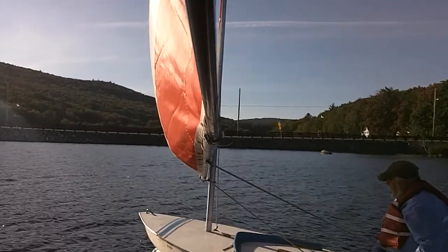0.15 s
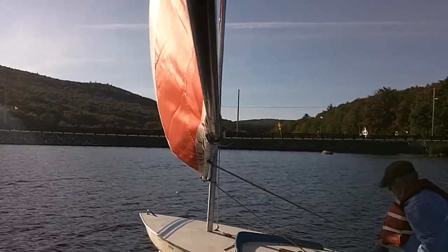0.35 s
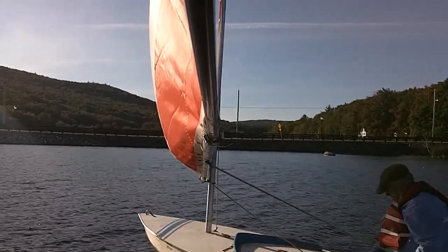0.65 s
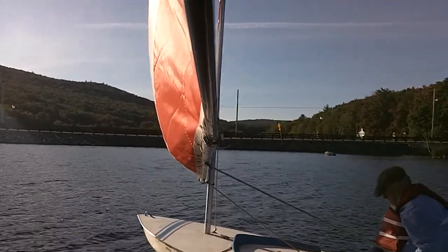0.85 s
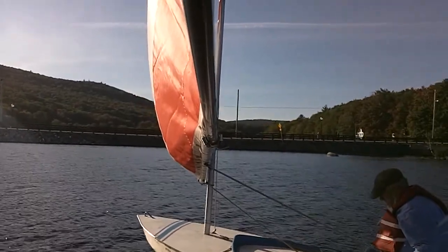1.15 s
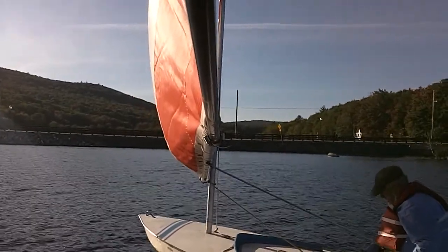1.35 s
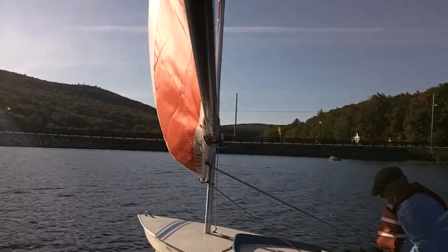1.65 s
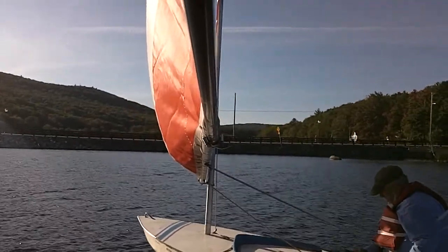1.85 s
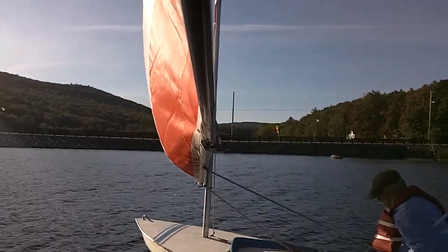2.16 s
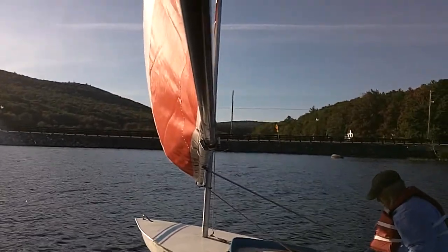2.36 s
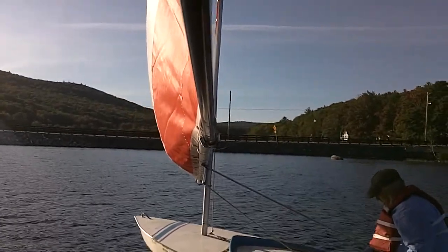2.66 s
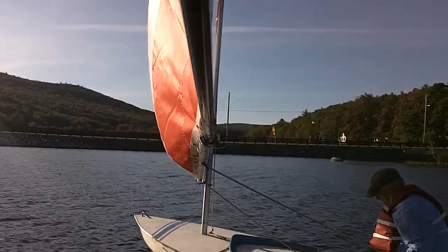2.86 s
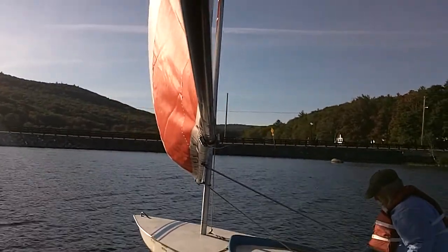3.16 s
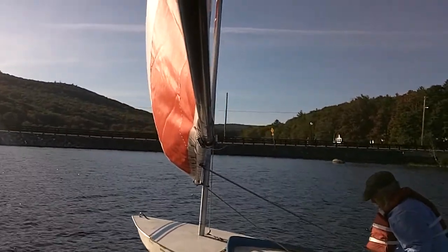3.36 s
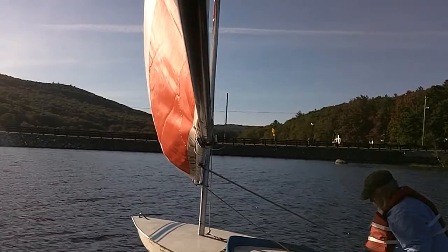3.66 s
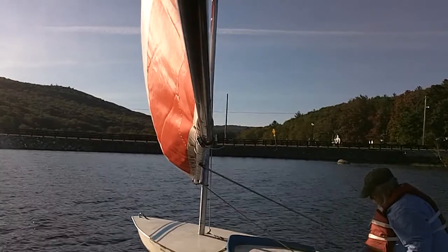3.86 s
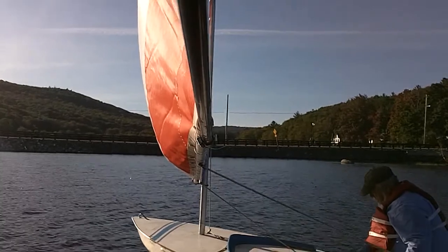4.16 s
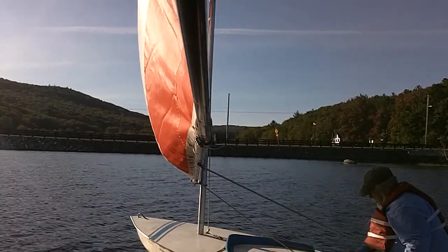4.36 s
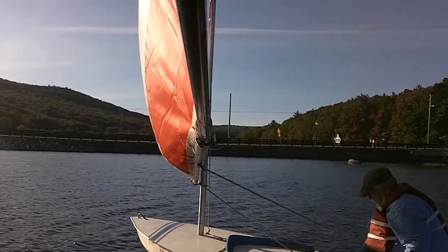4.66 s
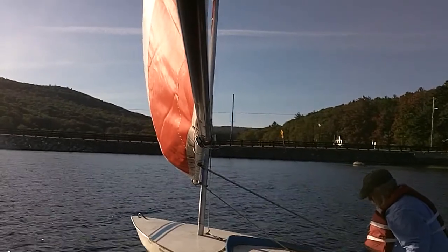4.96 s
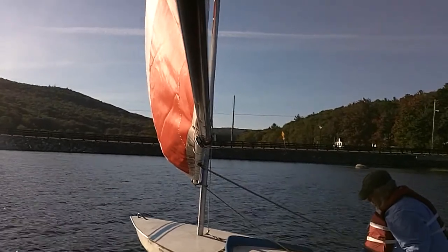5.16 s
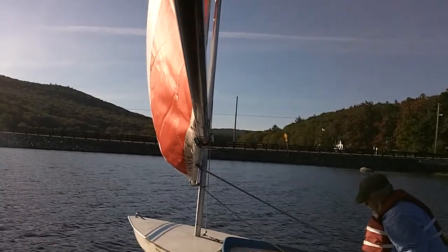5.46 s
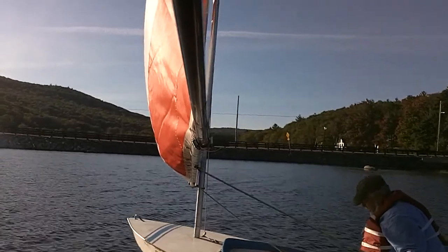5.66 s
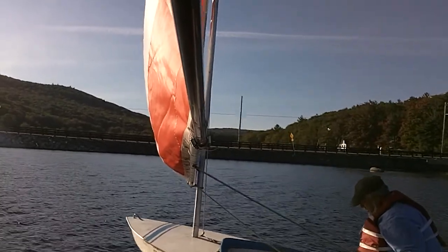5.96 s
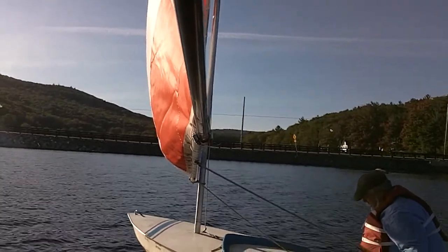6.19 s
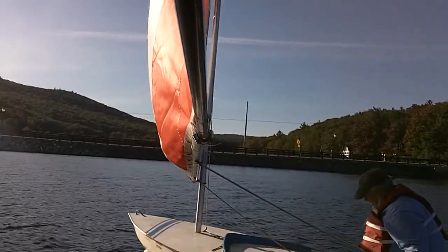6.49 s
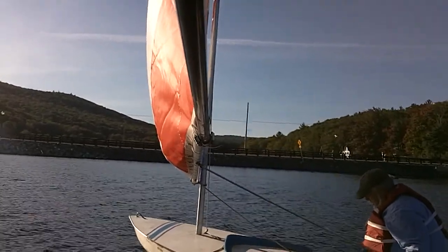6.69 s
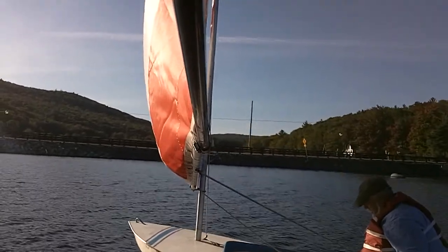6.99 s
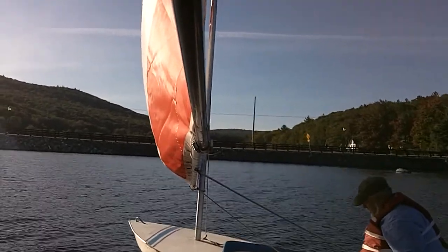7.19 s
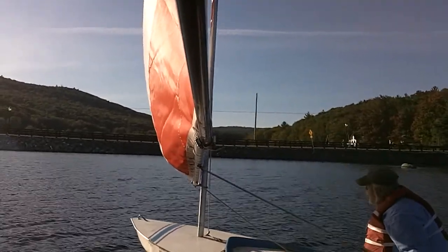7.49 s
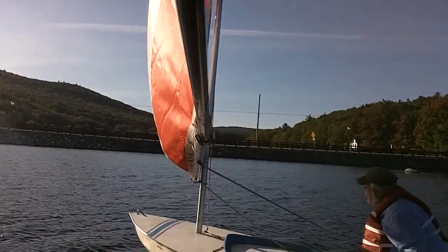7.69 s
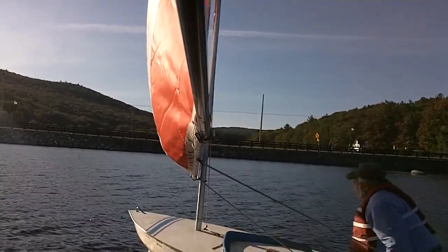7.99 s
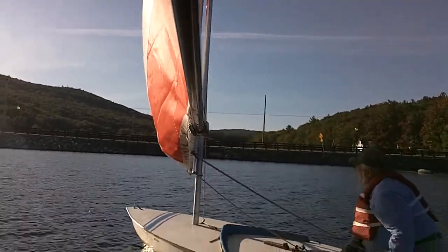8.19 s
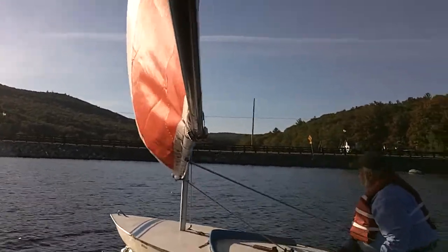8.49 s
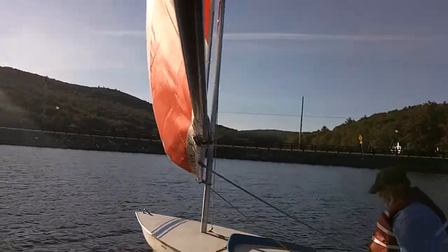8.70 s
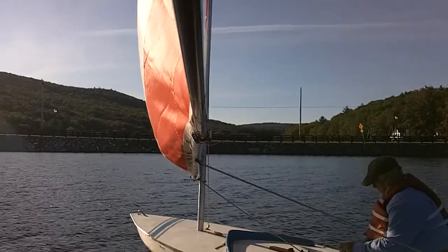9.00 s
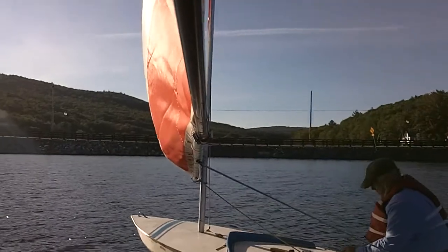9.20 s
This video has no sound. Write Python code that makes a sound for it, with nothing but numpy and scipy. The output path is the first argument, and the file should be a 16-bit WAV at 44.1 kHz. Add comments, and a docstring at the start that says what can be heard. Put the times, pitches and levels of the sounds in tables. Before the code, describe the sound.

From a small camera aboard a gliding sailboat, dense small bubbles ring and gurgle over a soft wash of water. Tiny drops tick and fizz, nearby bubbles pop at irregular moments, and wavelets lightly slap the hull. Deep gusts flutter and thump against the microphone throughout, heaviest in the second half. Outdoors, mono, close and muffled on top.

```python
"""A small sailboat glides over a rippled lake. From the start, wavelets gurgle under the hull, the bow wave
fizzes and a breeze rumbles and flutters: crowds of ringing bubbles and drops over coloured noise.
Soon single bubbles plop close by, short gusts swell the wind and droplets tick back onto the water.
Then wavelets slap the hull with bursts of noise and bubbles, and eddies thump as brief swings of pressure.
All is heard through the single microphone of a small camera, with several notches and little treble."""
import sys
import numpy as np
from scipy import signal
from scipy.fft import rfft, irfft, next_fast_len
from scipy.io import wavfile
from scipy.ndimage import uniform_filter1d

SR = 44100
rng = np.random.default_rng(int(sys.argv[2]) if len(sys.argv) > 2 else 0)


def output_pcm(signal):
    """Save a mono or channel-first signal as 16-bit PCM at the path in sys.argv[1].

    Samples are clipped to [-1, 1] before scaling.
    """
    pcm = np.clip(np.atleast_2d(signal).T, -1, 1) * 32767
    wavfile.write(sys.argv[1], SR, np.round(pcm).astype(np.int16))


N = 411894
TIME = np.arange(N) / SR


def from_db(db):
    """Turn decibels into a factor for loudness."""
    return 10 ** (np.asarray(db) / 20)


def rms_one(x):
    """Scale a sound to an average (rms) strength of 1."""
    return x / np.sqrt(np.mean(x ** 2) + 1e-20)


def in_time(rows):
    """Draw straight lines between the rows of a table, one curve per column after the time."""
    times, *columns = np.transpose(rows)
    return [np.interp(TIME, times, column) for column in columns]


def at_hz(points, hz):
    """Read a level in dB from a table of frequencies, spaced by ratio as the ear hears pitch."""
    knots, db = np.transpose(points)
    return np.interp(np.log(np.maximum(hz, 1)), np.log(knots), db)


def coloured(x, spectrum):
    """Make each frequency of a sound stronger or weaker, following a smooth curve."""
    size = next_fast_len(N + SR // 10)
    hz = np.arange(size // 2 + 1) * SR / size
    return irfft(rfft(x, size) * from_db(at_hz(spectrum, hz)), size)[:N]


def drift(corner_hz):
    """Wander slowly by chance with a spread of 1: noise smoothed above the corner frequency."""
    step = 40  # one value every 40 samples is enough for so slow a curve
    warm_up = 2000
    r = np.exp(-2 * np.pi * corner_hz * step / SR)
    noise = rng.standard_normal(N // step + warm_up + 2)
    slow = signal.lfilter([1], [1, -2 * r, r * r], noise)[warm_up:]
    return np.interp(np.arange(N) / step, np.arange(len(slow)), rms_one(slow))


def ring(clicks, hz, t60):
    """Let each click start a sine as high as the click, which fades by 60 dB in t60 seconds."""
    r = from_db(-60 / (t60 * SR))
    w = 2 * np.pi * hz / SR
    return signal.lfilter([0, np.sin(w)], [1, -2 * r * np.cos(w), r * r], clicks + 1e-18)


def add(out, s, sound):
    """Mix a short sound in at time s."""
    start = int(np.clip(round(s * SR), 0, N))
    out[start:start + len(sound)] += sound[:N - start]


def bubble(hz, t60, rise):
    """An air pocket rings and fades as its pitch glides by rise octaves; a bigger glide holds the ring longer."""
    t = np.arange(int(t60 * SR) + 2) / SR
    bend = 1.35 + min(abs(rise), 1)
    fade = np.exp(-np.log(1000) * (t / t60) ** bend)
    onset = 1 - np.exp(-2 * t * hz)
    pitch = hz * 2 ** (rise * t / t60)
    return fade * onset * np.sin(2 * np.pi * np.cumsum(pitch) / SR)


def turbulence(spectrum, lumpy_db, corner_hz):
    """Churning flow is noise of one colour whose strength wanders, so it comes in lumps."""
    noise = rng.standard_normal(N)
    lumps = from_db(lumpy_db * drift(corner_hz))
    return rms_one(coloured(noise * lumps, spectrum))


def patter(per_s, low_hz, high_hz, cycles, spread_db, clump_db, count=24):
    """Tiny drops and bursting bubbles come in clumps and ring for a few cycles."""
    luck = rng.random(N)
    chance = per_s * from_db(clump_db * drift(12)) / SR
    at = np.flatnonzero(luck < chance)
    size, sign, pitch = rng.random((3, N))[:, at]
    # most clicks are small and a few are large
    heights = from_db(spread_db * np.minimum(-np.log(1 - size), 4.5)) * np.sign(sign - .5)
    out = np.zeros(N)
    for k, hz in enumerate(np.geomspace(low_hz, min(high_hz, .45 * SR), count)):
        clicks = np.zeros(N)
        clicks[at] = heights * ((pitch * count).astype(int) == k)
        out += ring(clicks, hz, cycles / hz)
    return rms_one(out)


# how strong the distant bubbles are by pitch: (pitch [Hz], relative level [dB])
BUBBLE_LEVELS = [(400, -10.5), (2500, 4.5)]


def gurgle(low_hz, high_hz, cycles, rise, spread_db, count):
    """A crowd of smaller bubbles along the hull; the longer one rings, the further it can glide."""
    out = np.zeros(N)
    for when, pitch, size, life, glide in rng.random((count, 5)):
        hz = low_hz * (high_hz / low_hz) ** pitch
        stretch = 2 ** (2 * life - 1)
        db = at_hz(BUBBLE_LEVELS, hz) + spread_db * min(-np.log(1 - size), 2)
        height = from_db(db) / np.sqrt(stretch)
        add(out, when * N / SR, height * bubble(hz, stretch * cycles / hz, rise * glide * stretch))
    return rms_one(out)


# water flowing along the boat, before the mix trims:
# (time [s], gurgle level [dB], spray level [dB])
WATER_FLOW = [(0.0, -49, -55.5), (0.23, -48.5, -52), (1.77, -48.5, -56.5), (2.26, -51, -54.5),
              (2.36, -48.5, -53), (3.09, -49, -58.5), (3.46, -47, -51.5), (3.64, -51, -57),
              (4.06, -48, -52.5), (4.14, -50, -55.5), (6.11, -49, -54), (7.05, -48, -56.5),
              (7.18, -50.5, -61), (7.36, -52, -56.5), (7.67, -52, -60), (8.48, -47.5, -51),
              (9.24, -48, -55.5)]
# colour of the water noise at the hull: (frequency [Hz], relative level per Hz [dB])
WASH_COLOUR = [(150, -4.5), (300, -6), (420, -2), (600, -3), (1000, -6), (2100, -5.5), (3200, -24),
               (6000, -68)]


def hull_water():
    """Wavelets fold air under the hull: low and high bubbles ring, over splashes and a wash of noise."""
    gurgle_db, _ = in_time(WATER_FLOW)
    plops = from_db(-6.2) * gurgle(
        low_hz=600, high_hz=1350, cycles=22, rise=.5, spread_db=2.8, count=760)
    blips = from_db(-4.8) * gurgle(
        low_hz=900, high_hz=2400, cycles=23, rise=.25, spread_db=3.8, count=1200)
    splashes = from_db(-8.2) * patter(
        per_s=420, low_hz=650, high_hz=2600, cycles=9, spread_db=3.2, clump_db=3.5)
    wash = from_db(-6) * turbulence(WASH_COLOUR, lumpy_db=1.0, corner_hz=22)
    return from_db(gurgle_db - 0.86) * (plops + blips + splashes + wash)


# colour of the spray noise at the bow: (frequency [Hz], relative level per Hz [dB])
SPRAY_COLOUR = [(1200, 10), (3300, 10), (4500, 9.5), (9500, 11), (15000, -53)]
SPLASH_DB, SPLASH_S = 3.5, 0.0097  # swell of the spray, and the time it takes to build and to fade


def bow_spray():
    """The bow wave fizzes: tiny rings and hissing noise, swelling briefly around each falling droplet."""
    _, spray_db = in_time(WATER_FLOW)
    splash_db = SPLASH_DB * sum(
        np.exp(-np.minimum(abs(TIME - s) / SPLASH_S, 20)) for s, _ in DROPLETS)
    fizz = from_db(1.5) * patter(
        per_s=1150, low_hz=2900, high_hz=6000, cycles=30, spread_db=3.5, clump_db=3.2)
    spray = from_db(2.1) * turbulence(SPRAY_COLOUR, lumpy_db=2.1, corner_hz=28)
    mist = from_db(6.5) * patter(
        per_s=420, low_hz=6400, high_hz=13500, cycles=29, spread_db=2.8, clump_db=5.5)
    return from_db(spray_db + splash_db + 2.0) * (fizz + spray + mist)


# the breeze between gusts, before the trims: (time [s], rumble level [dB], flutter level [dB])
BREEZE_LEVELS = [(0.0, -46.5, -57.5), (0.86, -41, -52), (1.8, -46.5, -56), (2.2, -47, -54),
                 (2.65, -38, -53.5), (3.15, -41.5, -53), (3.61, -42.5, -54), (4.79, -43.5, -55.5),
                 (6.4, -42, -51.5), (6.84, -37, -48), (8.25, -46.5, -50.5), (8.84, -44, -47.5),
                 (9.34, -47, -47.5)]
# colours of large and of small eddies: (frequency [Hz], relative level per Hz [dB])
RUMBLE_COLOUR = [(6, -8), (15, 4.5), (32, 2), (52, -2), (80, -5.5), (120, -20), (250, -79)]
FLUTTER_COLOUR = [(40, -6), (80, -3.5), (100, 0.5), (165, -8.5), (260, -14), (400, -24), (900, -55)]
BREEZE_WAVERS_DB, BREEZE_CORNER_HZ = 1.5, 5.1
FLUTTER_FOLLOWS = 0.36  # share of a gust's rise in dB that the flutter takes on


def wind():
    """Large eddies rumble on the microphone port, small ones flutter harder in gusts, single ones thump."""
    breeze_db, flutter_db = in_time(BREEZE_LEVELS)
    breeze = from_db(breeze_db + 3.0 + BREEZE_WAVERS_DB * drift(BREEZE_CORNER_HZ))
    strength = np.sqrt(breeze ** 2 + gusts())
    rumble = turbulence(RUMBLE_COLOUR, lumpy_db=2.5, corner_hz=18.3)
    # even out the noise, so that breeze and gusts set its strength
    local_power = uniform_filter1d(rumble ** 2, size=6000)
    rumble = rumble / np.sqrt(local_power + 1e-9)
    flutter_strength = from_db(flutter_db + 4.5) * (strength / breeze) ** FLUTTER_FOLLOWS
    flutter = flutter_strength * turbulence(FLUTTER_COLOUR, lumpy_db=2.5, corner_hz=13.6)
    thumps = from_db(-1) * buffets(width_s=.0045)
    return from_db(1.03) * strength * rumble + flutter + thumps


# the nearest bubbles: (time [s], starting pitch [Hz], level before the mix [dB],
# time to fade by 60 dB [s], glide over that time [octaves])
NEAR_BUBBLES = [(0.146, 545, -35, .036, .6), (0.151, 1300, -37, .022, .7), (0.265, 1260, -35, .025, .3),
                (0.546, 1060, -34, .025, .1), (0.603, 850, -37, .022, 0), (0.682, 520, -36, .07, 1.4),
                (0.814, 1130, -31, .022, .6), (0.841, 720, -33, .018, 0), (0.986, 650, -38, .045, .8),
                (1.344, 940, -37, .025, .3), (1.384, 630, -38, .045, 1.2), (1.441, 1030, -37, .03, .6),
                (1.56, 690, -31, .025, -.5), (1.566, 1270, -31, .028, .4), (1.572, 430, -39, .1, 1.7),
                (1.795, 1080, -33, .025, 0), (1.877, 1510, -32, .022, .3), (1.908, 1100, -35, .025, .3),
                (2.124, 650, -39, .035, .8), (2.345, 990, -32, .022, 0), (2.466, 410, -39, .03, 1.5),
                (2.77, 1150, -34, .025, 0), (2.955, 590, -38, .05, .2), (3.162, 1440, -30.5, .025, .1),
                (3.387, 2090, -22.5, .01, .05), (3.715, 1430, -36, .025, 0), (4.018, 950, -32, .018, .1),
                (4.024, 1080, -34, .04, .3), (4.438, 1720, -37, .022, .1), (4.478, 1080, -32.5, .022, 0),
                (4.583, 1040, -37, .04, 0), (4.753, 680, -33, .025, .1), (4.762, 780, -34, .025, .1),
                (5.075, 690, -38, .04, .5), (5.187, 1130, -34, .02, 0), (5.287, 1700, -28.5, .01, .1),
                (5.308, 1900, -36, .028, -.2), (5.52, 1370, -37, .04, .7), (5.832, 900, -36, .035, -.3),
                (5.912, 510, -40, .08, 1.1), (5.986, 540, -39, .055, .9), (6.165, 510, -42, .07, .7),
                (6.345, 440, -44, .11, .8), (6.571, 780, -36, .03, 0), (6.652, 1030, -35, .03, .3),
                (6.839, 1020, -27, .017, 0), (6.97, 510, -41, .06, .6), (7.038, 1380, -33, .02, .1),
                (7.329, 2000, -25, .006, 0), (7.741, 1550, -32, .022, .05), (8.175, 940, -32, .012, .1),
                (8.248, 570, -31, .05, -.1), (8.434, 490, -30, .025, 0), (8.446, 370, -30, .035, .1),
                (8.459, 570, -33, .035, .1), (8.53, 1230, -23, .008, .1), (8.738, 480, -38, .07, .7),
                (8.764, 800, -34, .03, 0), (8.79, 570, -39, .08, .7), (8.855, 1620, -34, .025, .05),
                (8.86, 1290, -35, .03, .4), (9.047, 970, -32.5, .042, .6), (9.093, 860, -35, .04, 0),
                (9.168, 990, -36, .03, .5), (9.244, 590, -38, .06, .7)]


def near_bubbles():
    """Single air pockets plop close by: some hold their pitch, many swoop upwards and a few sink."""
    out = np.zeros(N)
    for s, hz, db, t60, rise in NEAR_BUBBLES:
        add(out, s, from_db(db) * bubble(hz, t60, rise))
    return out


# gusts: (time of full strength [s], rumble level before the trim [dB], hold [s])
GUST_EVENTS = [(0.37, -31, 0.037), (0.52, -34, 0.11), (0.698, -34.5, 0.25), (1.176, -34.5, 0.24),
               (1.665, -28.5, 0.02), (2.407, -30, 0.08), (2.573, -38, 0.047), (2.774, -36, 0.39),
               (4.962, -34.5, 0.1), (5.13, -37.5, 0.087), (5.931, -30.5, 0.054), (6.678, -27, 0.066),
               (6.78, -34.5, .13), (6.998, -31.5, 0.044), (7.098, -31.5, 0.071), (7.421, -28.5, 0.034),
               (7.636, -25.5, 0.017), (8.187, -28.5, 0.022), (8.694, -33.5, 0.094)]
GUST_ATTACK_S, GUST_RELEASE_S = 0.0036, 0.023


def gusts():
    """Gusts swell quickly, hold and die away; their powers add up."""
    power = np.zeros(N)
    for s, db, hold_s in GUST_EVENTS:
        before = np.maximum(s - TIME, 0) / GUST_ATTACK_S
        after = np.maximum(TIME - s - hold_s, 0) / GUST_RELEASE_S
        power += (from_db(db) * np.exp(-np.minimum(before + after, 20))) ** 2
    return power


# droplets that fall back on the water: (time [s], level of the tick before the microphone [dB])
DROPLETS = [(0.376, -25.5), (0.496, -28), (0.552, -28), (0.699, -25), (0.854, -27), (0.953, -31),
            (1.283, -30.5), (1.687, -30), (1.895, -30), (2.378, -23), (2.685, -30), (3.223, -28),
            (3.885, -23), (4.019, -29), (5.02, -31), (5.57, -29), (5.71, -23.5), (6.165, -27), (6.247, -27),
            (7.005, -24), (7.036, -26), (7.383, -26), (8.304, -28), (8.432, -26), (8.705, -27),
            (8.923, -27)]
DROP_LOW_HZ, DROP_HIGH_HZ = 3250, 4580  # the ticks lie between these pitches


def droplets(cycles, splat_db, splat_s):
    """A falling drop splats on the surface as a burst of noise and traps a tiny bubble that ticks."""
    out = np.zeros(N)
    t = np.arange(SR // 20) / SR
    for s, db in DROPLETS:
        hz = rng.uniform(DROP_LOW_HZ, DROP_HIGH_HZ)
        # differences of noise sound bright
        splat = np.diff(rng.standard_normal(len(t) + 1)) * np.exp(-t / splat_s)
        add(out, s, from_db(db + splat_db) * splat)
        add(out, s, from_db(db) * bubble(hz, cycles / hz, 0))
    return out


# wavelets that slap the hull: (time [s], middle pitch [Hz], level before the mix [dB], length [s])
HULL_SLAPS = [(0.815, 800, -47, .1), (0.965, 1200, -48, .055), (1.565, 1200, -46, .04),
              (2.45, 600, -50, .15), (4.02, 1100, -49, .04), (4.753, 800, -45, .03), (5.07, 950, -48, .03),
              (8.245, 850, -44, .02), (8.258, 280, -45, .08), (8.433, 440, -39, .04),
              (8.486, 800, -43, .025), (8.53, 1200, -43, .04), (8.63, 400, -47, .1), (8.752, 750, -44, .1),
              (8.93, 270, -44, .04)]
SLAP_ATTACK_S, SLAP_OCTAVES = .003, 1.5  # onset time, and width of the band of pitches


def slaps(cycles, churn_db, count=24):
    """Each slap churns the water and sheds bubbles around its pitch, most of them early and a few later."""
    out = np.zeros(N)
    t = np.arange(SR // 2) / SR
    for s, hz, db, length_s in HULL_SLAPS:
        edges_hz = hz * 2 ** (SLAP_OCTAVES * np.array([-.5, .5]))
        band = signal.butter(2, edges_hz, "band", fs=SR, output="sos")
        churn = rms_one(signal.sosfilt(band, rng.standard_normal(len(t))))
        swell = (1 - np.exp(-t / SLAP_ATTACK_S)) * np.exp(-(t / length_s) ** 2)
        add(out, s, from_db(db + churn_db) * churn * swell)
        for wait, pitch, side in rng.random((count, 3)):
            own_hz = hz * 2 ** (SLAP_OCTAVES * (pitch - .5))
            height = from_db(db) * (1 - wait / 2) * np.sign(side - .5)
            add(out, s + length_s * wait ** 2, height * bubble(own_hz, cycles / own_hz, pitch / 4))
    return out


# single eddies that thump: (time of the middle [s], level before the trim [dB], pitch [Hz])
EDDY_THUMPS = [(0.96, -34, 140), (1.181, -30, 135), (1.203, -38, 190), (5.155, -36, 150), (5.982, -32, 105),
               (6.052, -35, 115), (6.702, -31, 130), (6.75, -33, 110), (6.797, -30, 80), (6.835, -34, 120),
               (6.902, -29, 130), (7.101, -33, 140), (7.135, -31, 70), (7.201, -30, 90), (8.479, -37, 160)]


def buffets(width_s):
    """A small vortex crosses the microphone port: a few swings of pressure that swell and fade."""
    out = np.zeros(N)
    t = np.arange(-SR // 10, SR // 10) / SR
    for s, db, hz in EDDY_THUMPS:
        swing = np.cos(2 * np.pi * (hz * t + rng.random()))
        add(out, s + t[0], from_db(db) * np.sqrt(2) * swing / np.cosh(t / width_s))
    return out


def scene():
    """Mix the water along the boat, the nearby plops, slaps and ticks, and the wind."""
    hull = hull_water()
    bow = bow_spray()
    laps = from_db(-3.3) * slaps(cycles=12, churn_db=0)
    plops = from_db(-3) * near_bubbles()
    ticks = droplets(cycles=15, splat_db=-11, splat_s=.002)
    return (hull + bow + plops + laps + ticks + wind())[None]


# how the microphone colours the sound: (frequency [Hz], level [dB])
MICROPHONE_RESPONSE = [(2000, 0), (3800, 1), (4900, -1), (5150, -7), (6200, -11), (7200, -16), (9500, -20),
                       (12000, -28), (15000, -31)]
# its notches: (middle frequency [Hz], width [Hz])
MICROPHONE_NOTCHES = [(2705, 934), (5500, 560), (7900, 5460), (10950, 1030)]
CUTOFF_HZ = 15300


def record(dry):
    """The camera dulls the treble, cuts four notches, one of them very wide, and removes the top."""
    x = coloured(dry[0], MICROPHONE_RESPONSE)
    for hz, width_hz in MICROPHONE_NOTCHES:
        b, a = signal.iirnotch(hz, hz / width_hz, fs=SR)
        x = signal.lfilter(b, a, x)
    top_cut = signal.ellip(10, .1, 80, CUTOFF_HZ, fs=SR, output="sos")
    return signal.sosfilt(top_cut, x)[None]


dry = scene()
out = record(dry)
output_pcm(out)
```